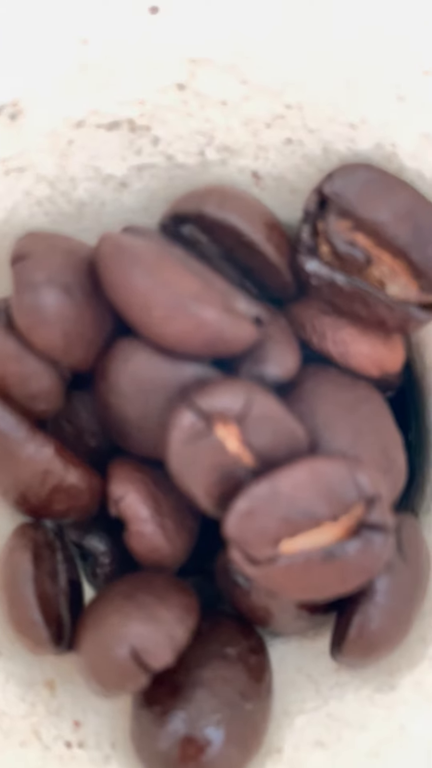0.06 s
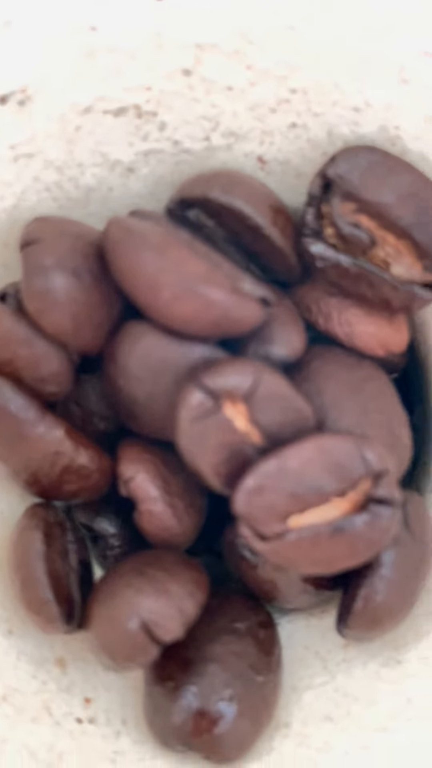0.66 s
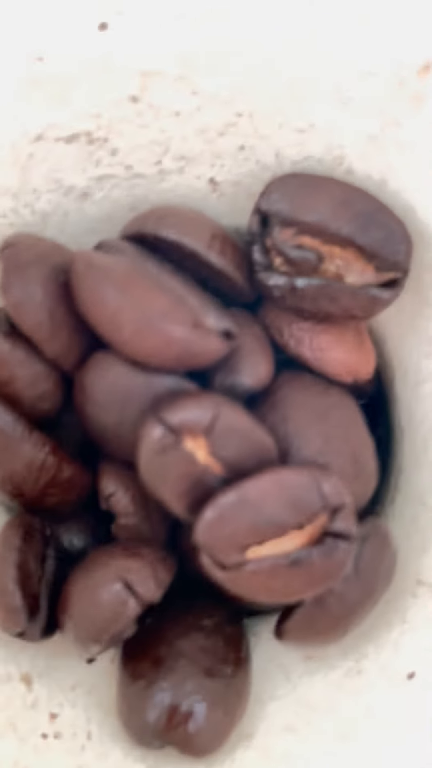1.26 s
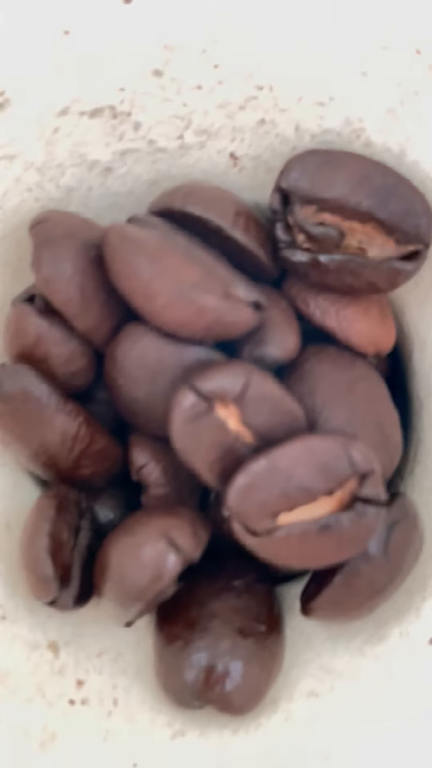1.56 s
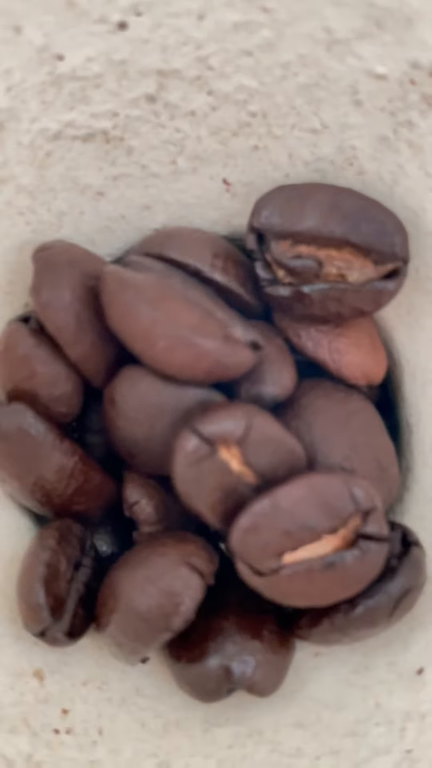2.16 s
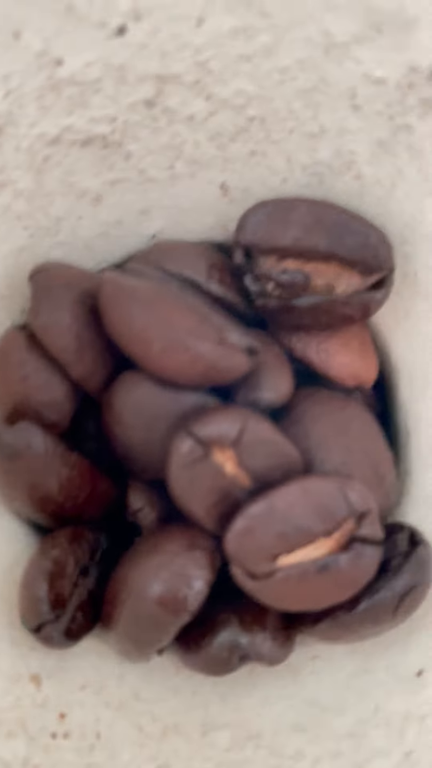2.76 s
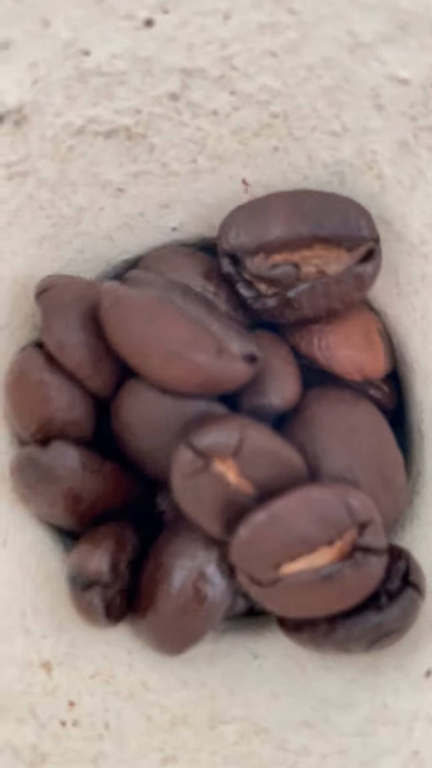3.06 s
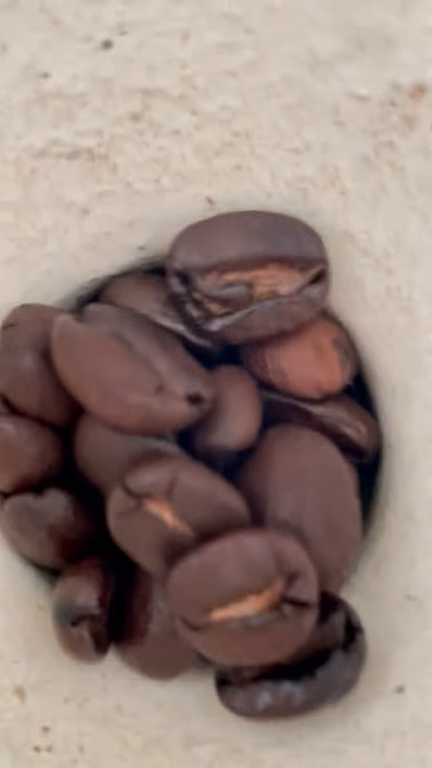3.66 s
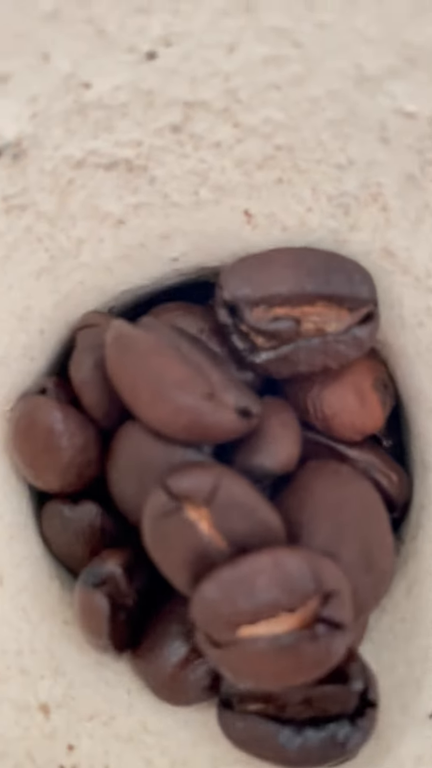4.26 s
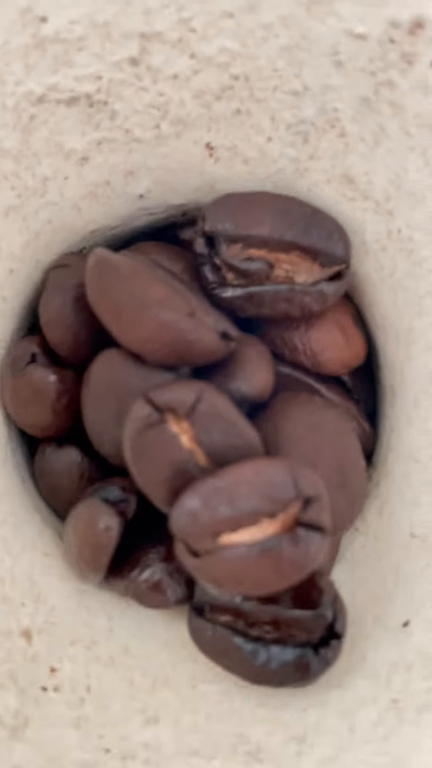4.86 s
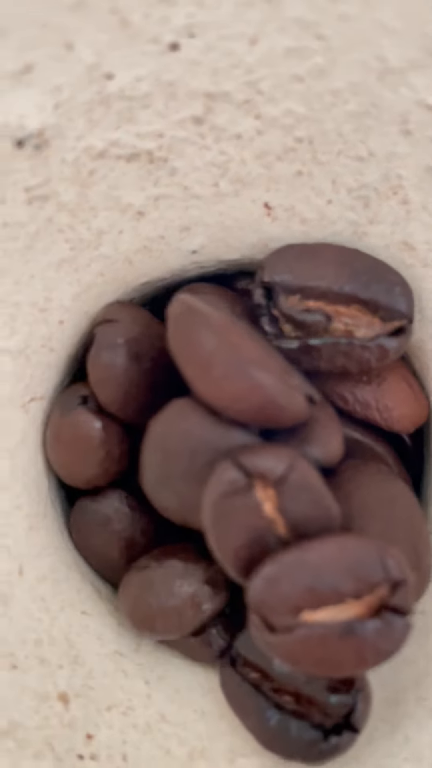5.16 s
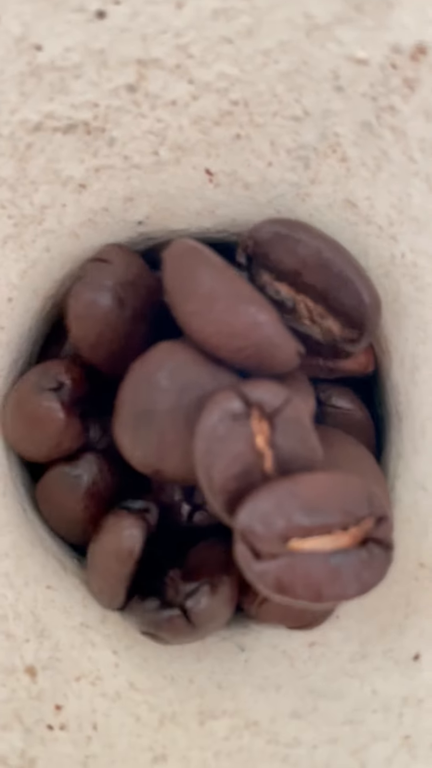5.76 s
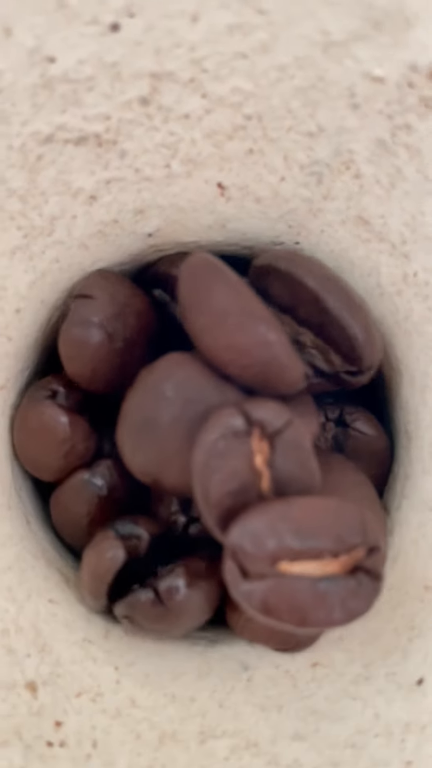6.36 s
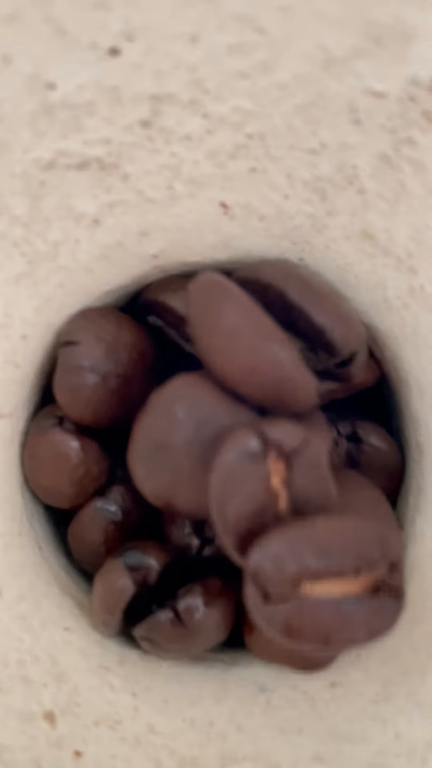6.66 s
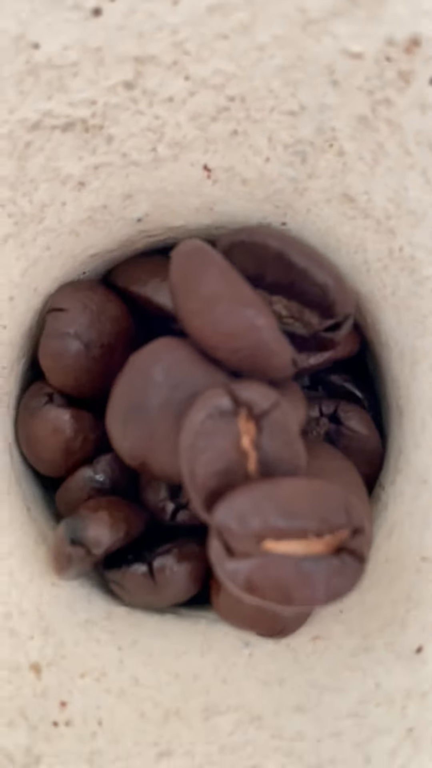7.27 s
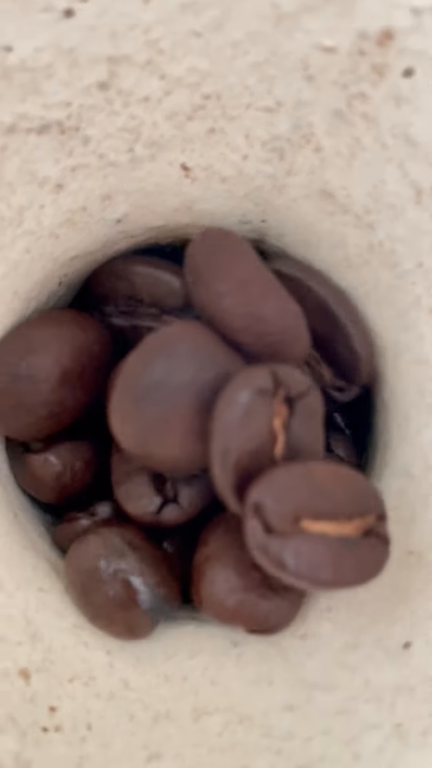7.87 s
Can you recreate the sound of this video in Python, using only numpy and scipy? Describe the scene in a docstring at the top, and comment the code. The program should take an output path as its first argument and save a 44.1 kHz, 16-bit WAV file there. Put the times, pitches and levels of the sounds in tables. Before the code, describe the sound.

Coffee beans crack, crunch and snap very close in a turning hand mill, over a low rumble with soft thuds and brief squeals.

```python
"""First come a few faint taps and a brief low hum in a quiet room: coffee beans shift in a hand mill.
Then, very close by, the burr (the toothed grinding wheel) starts to turn. Whole beans crack, and
their pieces crunch, snap and sizzle, the crunch growing louder the harder the hand pushes.
The mill rumbles, and thuds whenever the burr catches. Now and then the burr rubs and squeals."""
import sys
import numpy as np
from scipy import signal
from scipy.fft import rfft, irfft, next_fast_len
from scipy.io import wavfile

SR = 44100
rng = np.random.default_rng(int(sys.argv[2]) if len(sys.argv) > 2 else 0)


def digitize_waveform(pressure):
    """Quantize a signal to 16-bit integers and store it at the path in sys.argv[1].

    Rows of a 2-D input are taken as channels; values are limited to [-1, 1].
    """
    field = np.atleast_2d(pressure).T
    bounded = np.clip(field, -1, 1)
    quanta = np.round(bounded * 32767).astype(np.int16)
    wavfile.write(sys.argv[1], SR, quanta)


N = 358091
TIME = np.arange(N) / SR

# Tone colours: how much bass and treble a sound has. Each row: frequency in Hz, strength in dB.
ROOM_COLOUR = [(22, -40), (52, 10), (90, -5), (150, -7), (270, -4.5), (500, -22.5), (800, -22.5),
               (1500, -30), (4000, -35), (9000, -40), (16000, -50)]
RUMBLE_COLOUR = [(28, -34), (52, -6), (90, -6), (125, 0), (160, 0), (215, -2), (265, 1.5), (305, -2.5),
                 (375, -1), (480, -13), (700, -32), (2000, -70)]
SIZZLE_COLOUR = [(9000, -55), (13200, -18), (13900, 6), (14500, -13), (16000, -22)]
SNAP_COLOUR = [(600, -14), (1500, 0), (3000, -5), (6000, 8), (8500, 0), (10000, -13.5), (14000, 13),
               (16000, -3.5)]
CRUNCH_COLOUR = [(30, -24), (100, -8), (380, -5.5), (600, -12.5), (800, -8), (1300, 2.5), (1750, 1),
                 (2400, -5), (3000, -2), (4500, -8), (6400, -5.5), (7400, -10.5), (8600, -13), (12600, -17),
                 (15500, -16)]
CRACK_COLOUR = [(60, -17), (230, 1), (550, -16), (800, -11), (1150, 1.5), (1700, 2), (2400, -5), (3000, -6),
                (4400, -7), (5800, -14), (7400, -16), (8600, -13), (10500, -15), (15500, -25)]

# Notes the mill rings with. Each row: pitch in Hz, level in dB, seconds to fade by 60 dB.
IDLE_NOTES = [(860, -45, 0.45), (1430, -45, 0.21), (3180, -50, .12), (4330, -53, 0.4), (4500, -51, 0.2),
              (6440, -56, .3), (8580, -57, .15)]  # the resting burr
MILL_NOTES = [(1530, -44.5, 0.01), (1838, -49.5, 0.091), (2383, -30.5, 0.016), (3680, -76, 0.009),
              (4325, -44.5, 0.038), (4620, -30, 0.011), (6440, -47, 0.081), (7700, -66, 0.025),
              (8660, -18.5, 0.005), (9130, -31, 0.027), (13300, -60, 0.017)]  # the whole mill with its burr
OUTER_BURR_NOTES = [(1800, -52, 0.023), (3670, -29, 0.015)]  # the part a breaking bean is wedged against

# The room's echo. Each row: frequency in Hz, seconds to fade by 60 dB.
ECHO_FADE = [(200, 0.6), (1400, 0.071), (4000, 0.15), (12000, 0.04)]
# The microphone's two openings. Each row: frequency in Hz, how far the left one leads in radians.
LEFT_LEAD = [(0, 0), (860, -0.2), (2410, 0.4), (3960, 0.5), (4570, 0.9), (4820, 1.8), (5080, -0.3),
             (6370, 0.9), (9130, 2.9), (11500, 3.4), (11800, 4.0), (14000, 5.5), (14600, 6.2), (16500, 6.3)]
# How hard the hand turns the burr. Each row: time in seconds, effort in dB.
HAND_EFFORT = [(0.66, -94), (0.74, -40.5), (0.81, -34), (0.85, -26), (1.0, -32), (1.13, -31), (1.2, -26.5),
               (1.4, -30), (1.54, -23.5), (1.88, -26), (2.05, -23.5), (2.52, -27), (3.0, -21.5),
               (3.32, -28), (3.38, -31.5), (3.47, -27.5), (3.6, -29.5), (3.98, -26.5), (6.2, -26.5),
               (6.55, -29.5), (7.1, -26), (7.6, -28), (8.1, -27.5)]
# How much the fine grounds sizzle. Each row: time in seconds, level change in dB.
SIZZLE_AMOUNT = [(.8, -23), (3.5, -21), (5.8, -16.5), (7.1, -14), (8.1, -21)]
# A stronger crack runs longer through the bean. Each row: crack level in dB, length in seconds.
CRACK_LENGTHS = [(-20, .002), (-9, .0065)]

# Beans shift before the turning starts. Each row: start in seconds, relative level in dB.
TOUCHES = [(.14, -59), (.158, -48), (.182, -52), (.235, -49), (.246, -40), (.354, -57), (.387, -58),
           (.492, -70), (.657, -59), (.663, -50.5), (.694, -47.5), (.727, -47)]
# The burr catches. Each row: loudest moment in seconds, relative level in dB, pitch then in Hz.
THUDS = [(0.864, -34, 182), (1.321, -29.5, 230), (1.565, -29.5, 250), (1.76, -29.5, 228), (2.008, -28, 192),
         (2.052, -26.5, 225), (2.376, -24.5, 215), (2.44, -26.5, 235.6), (2.568, -29.5, 244),
         (2.626, -29.5, 178), (2.852, -29.5, 188), (3.011, -28.5, 215), (3.052, -25, 189),
         (3.325, -35, 251), (3.734, -30, 209), (3.898, -25, 251), (3.953, -24.5, 221), (4.36, -27.5, 244),
         (4.538, -27.5, 185), (4.6, -31, 366), (4.731, -23.5, 199), (4.983, -22.5, 193), (5.03, -32, 345),
         (5.138, -30.5, 257), (5.357, -26, 234), (5.5, -31.5, 195), (5.708, -28.5, 207), (5.8, -29, 201),
         (5.916, -30.5, 190), (6.164, -26.5, 142), (6.233, -27, 247), (6.333, -32, 159), (6.41, -29, 191),
         (6.775, -29.5, 214), (7.039, -29, 241), (7.168, -26.5, 167.5), (7.401, -31.5, 144),
         (7.437, -30, 250), (7.476, -29.5, 262), (7.93, -33, 273), (8.1, -28, 200)]
# The burr sings. Each row: start in seconds, length in seconds, pitch in Hz, relative level in dB.
SQUEALS = [(1.483, 0.045, 7000, -33.5), (1.583, 0.033, 6440, -13), (1.607, 0.048, 6440, -22),
           (1.651, 0.036, 6430, -21), (1.662, .013, 6220, -21), (1.69, 0.033, 6440, -33),
           (3.29, 0.018, 6640, -24), (3.308, 0.02, 6400, -26), (4.604, 0.0076, 6440, -18.5),
           (6.62, 0.03, 6300, -31), (6.65, 0.027, 6440, -25.5), (6.668, 0.047, 6440, -34),
           (7.413, 0.021, 6400, -30.5), (7.43, 0.027, 6440, -32), (0.365, 0.078, 6440, -70)]
# Thin splinters of shell snap. Each row: start in seconds, relative level in dB.
SNAPS = [(0.9342, -10.5), (1.21, -9.5), (2.0707, -8), (2.7968, -13), (2.9464, -14), (3.1038, -17),
         (3.437, -19), (3.4553, -13), (3.466, -9), (3.9644, -8), (3.9823, -11), (3.9866, -11.5),
         (4.429, -17), (4.605, -16), (4.786, -17), (5.4659, -9), (5.7729, -13), (5.8361, -8), (5.8514, -13),
         (5.908, -14.5), (6.537, -10.5), (7.0818, -10), (7.0882, -15), (7.1071, -18), (7.4674, -15)]
# Pieces get squashed. Each row: time in seconds, relative level in dB, brightness in dB.
CRUMBLES = [(1.226, -22.5, -1), (1.537, -26.5, -6), (1.561, -25, 0.0), (2.032, -22.5, 6), (2.153, -25, -8),
            (2.254, -25, -16), (2.553, -25, 5), (2.666, -28, 3), (2.634, -27, 4), (2.893, -25, 8),
            (2.913, -28, -8), (2.975, -21, -13), (3.03, -23.5, -13), (3.05, -25, -7), (3.156, -25, -12),
            (3.189, -19.5, -5), (3.273, -20.5, 2), (3.495, -25, -6), (3.575, -26, 2), (3.608, -25.5, -8),
            (3.648, -22, -10), (3.691, -26, 0), (3.892, -25.5, -2), (4.003, -25, 3), (4.187, -26.5, 4),
            (4.258, -24, -2.0), (4.366, -24.5, -2), (4.545, -25, -9), (4.692, -24.5, 0), (4.711, -21.5, 12),
            (4.974, -24.5, -4), (5.059, -22.5, -6), (5.118, -24.5, -5), (5.136, -25.5, -3),
            (5.226, -30, 6.0), (5.275, -24, -3), (5.378, -26, -4), (5.394, -25, 1), (5.493, -26, -22),
            (5.574, -26.5, 8.5), (5.628, -26, 2), (5.772, -26, -4), (5.872, -26.5, 4.5), (5.886, -25, -10),
            (5.974, -26, -11), (6.084, -24, -2), (6.179, -22.5, 1), (6.241, -24, -3), (6.417, -20.5, -3),
            (6.483, -26, 4), (6.614, -24, -2), (6.74, -25.5, -7), (6.758, -23.5, -5), (6.882, -25, 5),
            (6.915, -19.5, -11), (6.967, -25.5, 3), (7.038, -26.5, 6), (7.081, -22.5, -11), (7.192, -26, 0),
            (7.557, -21, 2), (7.805, -28.5, -4), (7.87, -22.5, 0), (8.072, -23, -1), (8.105, -21.5, 0)]
# Whole beans break. Each row: time in seconds, relative level in dB, brightness in dB,
# crumbling before the break in dB compared with the crack, the bean's pitch in Hz.
CRACKS = [(0.762, -31.5, 20, -17, 2500), (0.827, -11, -6.5, -10, 2400), (1.0168, -16.5, -10, -36, 1900),
          (1.03, -18.5, -3, -27, 1570), (1.175, -12, 4.5, -32, 1570), (1.33, -9.5, 5.5, -4.5, 2310),
          (1.615, -10.5, -1, -23, 1110), (1.644, -16, 9, -27, 2580), (1.9516, -11.5, 3, -29, 2240),
          (1.9903, -16.5, 3, -27.5, 1030), (2.101, -17, -1, -21, 1240), (2.334, -13, 10.5, -28, 1560),
          (2.385, -16, -1, 0, 1200), (2.4395, -11, 1.5, -4.5, 2600), (2.688, -18.5, 13, -18, 2250),
          (2.797, -11, 5, -15, 2360), (2.93, -16, 1, -27, 1090), (3.005, -13.5, -10, -7, 1420),
          (3.2528, -17, 7, -25, 1250), (3.2873, -13.5, 0, -12, 1090), (3.3187, -10, 0.5, -2, 2450),
          (3.551, -12.5, 2.5, -17, 1460), (3.6689, -13, 7, -10, 2560), (3.7683, -13.5, 1, -1.5, 1370),
          (3.816, -17, -10, -0.5, 2300), (3.9681, -18.5, 9, 1, 1800), (3.977, -14, -3, -7, 1330),
          (4.1092, -16.5, -2, -25, 1800), (4.1153, -16.5, 3, -3, 2350), (4.2023, -19, 7, -28.5, 2410),
          (4.3297, -15, -6, -20, 1800), (4.485, -18, -5, -6, 2180), (4.6044, -17, 10, -25, 2550),
          (5.152, -18.5, -8, 1, 1800), (5.188, -20.5, 15, -23, 1890), (5.245, -19.5, 13, 1.5, 2280),
          (5.4634, -11, 7, -25, 3650), (5.521, -17, -5, -27, 1750), (5.5443, -20.5, 12, -26, 2240),
          (5.835, -12, 10, -21, 1460), (5.991, -12, -3.5, -12, 1700), (6.1355, -10.5, 3, -26, 1650),
          (6.2263, -9, 6.5, -16.5, 1490), (6.2935, -12.5, -3, -25, 1260), (6.3433, -16, 2, -1, 1620),
          (6.44, -8.5, 1, -12, 1870), (6.5371, -15, 11, -12, 1830), (6.652, -14.5, 8, -33, 1500),
          (6.7089, -17, 0, -31.5, 1100), (6.7639, -19, 6, 5, 1460), (6.8903, -10, 6.5, -16.5, 1620),
          (7.059, -18, 5, 1, 1260), (7.2448, -13, 0.5, -25, 1290), (7.315, -16, 3, -8, 1390),
          (7.346, -10, 7.5, -10, 1830), (7.399, -17.5, 3, -24, 1850), (7.491, -17.5, 0, -32, 2000),
          (7.5865, -14, -1, -11.5, 1420), (7.691, -11, 0.5, -10, 1800), (7.9214, -8, 10, -10, 1760),
          (8.025, -20, -6, -21, 1630)]

BIG_CRACK_DB = -17.5  # a crack above this level eases the load and jolts the mill


def from_db(db):
    """Turns decibels into a number to multiply by."""
    return 10 ** (np.asarray(db) / 20)


def unit(x):
    """Scales a signal to an average (rms) size of 1."""
    return x / np.sqrt(np.mean(x ** 2) + 1e-20)


def unit_energy(x):
    """Scales a short sound to a total energy of 1."""
    return x / np.linalg.norm(x)


def look_up(table, hz):
    """Reads between a table's rows, on a scale of octaves."""
    row_hz, value = np.transpose(table)
    return np.interp(np.log(hz + 1), np.log(row_hz + 1), value)


def add(mix, start_s, sound):
    """Lays a sound into the mix."""
    part = mix[max(round(start_s * SR), 0):][:len(sound)]
    part += sound[:len(part)]


def wander(per_s, points):
    """A random curve that takes a new direction per_s times a second."""
    return unit(np.interp(TIME * per_s, np.arange(points), rng.standard_normal(points)))


def noise(colour):
    """Steady noise with the given tone colour."""
    shape = from_db(look_up(colour, np.fft.rfftfreq(N, 1 / SR)))
    return unit(irfft(rfft(rng.standard_normal(N)) * shape, N))


def click(colour, bright_db, patchy_db, smear_s, peak_hz=1500, peak_db=0, size=2048):
    """One tiny break. Each piece rings its own way, and paths through the mill smear the click."""
    hz = np.fft.rfftfreq(size, 1 / SR)
    grid = np.linspace(np.log(500), np.log(SR / 2), 48)
    patches, paths = (np.interp(np.log(hz + 500), grid, row) for row in rng.standard_normal((2, 48)))
    treble = hz ** 4 / (hz ** 4 + 2800. ** 4)
    db = look_up(colour, hz) + bright_db * treble + patchy_db * patches
    db += peak_db / (1 + (np.log2((hz + 1) / peak_hz) / 0.11) ** 2)  # a narrow peak gives a pitch
    log_gain = np.log(from_db(np.r_[db, db[-2:0:-1]]))
    spectrum = np.exp(np.conj(signal.hilbert(log_gain)))[:len(hz)]  # makes the click start sharply
    delay = np.exp(-2j * np.pi * np.cumsum(smear_s * abs(paths)) * hz[1])
    return unit_energy(irfft(spectrum * delay) * np.hanning(2 * size)[size:])


def ticks(rows, colour, gain_db, patchy_db, scatter_s):
    """Single small clicks, each with a little scatter after it."""
    out, t = np.zeros(N), TIME[:SR // 40]
    for start, db in rows:
        push = 0.65 * rng.standard_normal(len(t)) * np.exp(-t / scatter_s)
        push[0] = 1
        sound = signal.fftconvolve(push, click(colour, 0, patchy_db, smear_s=0.00027))
        add(out, start, from_db(db + gain_db) * unit_energy(sound))
    return out


def ringing(x, notes):
    """Every blow also sets the given notes ringing."""
    t = TIME[:SR // 4]
    ring = sum(from_db(db - 60 * t / fade_s) * np.cos(2 * np.pi * hz * t) for hz, db, fade_s in notes)
    return x + signal.oaconvolve(x, ring)[:N]


def stereo(x, delay_s=0):
    """Sound reaches the microphone's two openings out of step; an off-centre source adds a delay."""
    size = next_fast_len(N + SR // 10)
    hz = np.fft.rfftfreq(size, 1 / SR)
    lead = np.interp(hz, *np.transpose(LEFT_LEAD)) + 2 * np.pi * hz * delay_s
    sides = np.array([np.ones(len(hz)), np.exp(-1j * lead)])
    return irfft(rfft(x, size) * sides, size)[:, :N]


def room_echo(x):
    """The room gives a short echo whose bass lasts longest and is alike on both sides."""
    hz, t, bands = signal.stft(rng.standard_normal((2, SR // 2)), SR, nperseg=256)
    shared = 1 / (1 + (hz[:, None] / 700) ** 4)
    bands[1] = shared * bands[0] + np.sqrt(1 - shared ** 2) * bands[1]
    fade = from_db(-60 * t / look_up(ECHO_FADE, hz)[:, None]) * (t > .004)
    tail = signal.istft(bands * fade, SR, nperseg=256)[1]
    return signal.oaconvolve(x[None], tail / np.linalg.norm(tail[0]), axes=1)[:, :N]


def idle_rub(db=-68):
    """A hand rests on the crank, and the burr rubs just enough to ring faintly."""
    rub = from_db(db) * rng.standard_normal(N)
    return ringing(rub, IDLE_NOTES) - rub


def hum(start=.385, end=0.72, hz=108, db=-48):
    """A faint low hum swells briefly before the grinding."""
    swell = np.interp(TIME, [start, start + .03, end - .04, end], [0.15, 1.0, 0.65, 0.09])
    return from_db(db) * swell * np.sin(2 * np.pi * hz * TIME)


def touches():
    """Shifting beans tap the burr, waking only its high notes, and nudge the mill's body."""
    taps = ticks(TOUCHES, CRUNCH_COLOUR, gain_db=19.5, patchy_db=4, scatter_s=0.004)
    bumps = ticks(TOUCHES, RUMBLE_COLOUR, gain_db=18, patchy_db=4.5, scatter_s=0.0038)
    return ringing(taps, IDLE_NOTES[3:]) + bumps


def burr_load(dip_per_db=0.11, deepest_s=0.051):
    """The load on the burr in dB: the hand's effort, with a dip as each big crack frees the burr."""
    load = np.interp(TIME, *np.transpose(HAND_EFFORT), left=-100)
    age = TIME[:SR // 3] / deepest_s
    dip = (age * np.exp(1 - age)) ** 2
    for start, db, *_ in CRACKS:
        add(load, start, -dip_per_db * max(db - BIG_CRACK_DB, 0) * dip)
    return load


def rumble(load_db):
    """The heavy body rumbles under the crank, following a load that comes in lumps."""
    steady = noise(RUMBLE_COLOUR) * from_db(-22 + 0.7 * load_db)
    return steady * from_db(4.5 * np.tanh(wander(per_s=35, points=600)))


def thuds(gain_db=2, rise_s=.016, pitch_fall=.85):
    """When the burr catches or a big crack jolts it, the body gives a soft knock of falling pitch."""
    out, t = np.zeros(N), TIME[:SR // 10]
    age = t / rise_s
    swell = (age * np.exp(1 - age)) ** 3
    rattle = noise(RUMBLE_COLOUR)
    jolt_hz = 255 * np.exp(0.129 * rng.standard_normal(len(CRACKS)))
    jolts = [(when, db - 29, hz) for (when, db, *_), hz in zip(CRACKS, jolt_hz) if db > BIG_CRACK_DB]
    for when, db, hz in THUDS + jolts:
        cycles = np.cumsum(hz * pitch_fall ** (age - 1)) / SR + rng.random()
        swing = np.sin(2 * np.pi * cycles) + 0.39 * np.roll(rattle, -round(when * SR))[:len(t)]
        add(out, when - rise_s, from_db(db + gain_db) * swell * swing)
    return out


def squeals(gain_db=3, waver=0.0017):
    """The burr sticks and slips, singing one high, wavering note in short bursts."""
    out = np.zeros(N)
    drift, flutter_db = wander(per_s=73, points=2000), wander(per_s=320, points=4000)
    for start, length, hz, db in SQUEALS:
        span = np.arange(round(start * SR), round((start + length) * SR))
        tone = np.sin(2 * np.pi * np.cumsum(hz * (1 + waver * drift[span])) / SR)
        fade = signal.windows.tukey(len(span), .7)
        add(out, start, from_db(db + gain_db - flutter_db[span]) * fade * tone)
    return out


def fragment(colour, patchy_db, smear_s, burst_s):
    """One small piece gives way: a first break, then a quick flurry of smaller ones."""
    t = TIME[:SR // 70]
    spikes = rng.standard_normal(len(t)) ** 3
    flurry = unit_energy(spikes * np.exp(-t / (burst_s * rng.uniform(0.39, 2.96))))
    flurry[0] += 1
    body = click(colour, rng.normal(0, 3.2), patchy_db, smear_s)
    return unit_energy(signal.fftconvolve(flurry, body))


def crunch(load_db, colour, gain_db, per_s, spread_db, clump_db, patchy_db, smear_s, burst_s, kinds=24):
    """Pieces of many sizes are crushed in clumps, about per_s of them a second."""
    sizes = from_db(spread_db * np.minimum(rng.exponential(1, N), 3)) * rng.choice([-1, 1], N)
    hits = sizes * (rng.random(N) < per_s / SR)
    hits *= from_db(clump_db * np.tanh(wander(per_s=97, points=2000)))
    hits = unit(hits) * from_db(load_db + gain_db)
    kind = rng.integers(0, kinds, N)
    return sum(signal.oaconvolve(hits * (kind == k), fragment(colour, patchy_db, smear_s, burst_s))[:N]
               for k in range(kinds))


def crumbles(gain_db=-2, rise_s=.003):
    """A broken piece is squashed: a tight cluster of tiny breaks swells and dies away."""
    out, t = np.zeros(N), TIME[:SR // 25]
    scale = np.sqrt(.012 * SR)  # the energy of 12 ms of sound at size 1
    for when, db, bright_db in CRUMBLES:
        breaks = np.tanh(rng.standard_normal(len(t)) ** 3 / 5) * t * np.exp(-t / rise_s)
        body = click(CRACK_COLOUR, bright_db + 1, patchy_db=3.2, smear_s=0.000752)
        sound = unit_energy(signal.fftconvolve(breaks, body))
        add(out, when - 2 * rise_s, from_db(db + gain_db) * scale * sound)
    return out


def splitting(length_s, gap_s=.0005, uneven_db=3, fade_db=7, first_db=4):
    """A crack runs through a bean in quick, uneven steps, the first the largest, then stops short."""
    gaps, chance = rng.uniform(-1, 1, (2, 24))
    times = np.r_[0, np.cumsum(gap_s * (1 + .8 * gaps))[:-1]]
    sizes = from_db(uneven_db * chance - fade_db * times / length_s) * (times < length_s)
    sizes *= rng.choice([-1, 1], len(times))
    sizes[0] = from_db(first_db)
    return np.bincount((times * SR).astype(int), sizes)


def cracks(gain_db=-3.5, build_s=0.0073, settle_s=0.0022, settle_db=-13):
    """A bean crumbles under growing load, splits, and its pieces settle."""
    out, t = np.zeros(N), TIME[:SR // 16]
    scale = np.sqrt(.006 * SR)  # the energy of 6 ms of sound at size 1
    for when, db, bright_db, before_db, hz in CRACKS:
        body = click(CRACK_COLOUR, bright_db - 1, patchy_db=2, smear_s=0.000833, peak_hz=hz, peak_db=6)
        spikes = rng.standard_normal((2, len(t))) ** 3
        build_up = (spikes[0] * np.exp(-t / build_s))[::-1]
        settling = spikes[1] * np.exp(-t / settle_s)
        length_s = np.interp(db, *np.transpose(CRACK_LENGTHS))
        stages = [(when - t[-1], build_up, before_db - 1),
                  (when, splitting(length_s), 0),
                  (when + length_s, settling, settle_db)]
        for start, stage, stage_db in stages:
            sound = unit_energy(signal.fftconvolve(stage, body))
            add(out, start, from_db(db + stage_db + gain_db) * scale * sound)
    return out


def scene():
    """The mill and its beans close up, over a quiet room."""
    load = burr_load()
    coarse = crunch(load, CRUNCH_COLOUR, gain_db=-5.5, per_s=190, spread_db=3, clump_db=4,
                    patchy_db=3.2, smear_s=0.0007, burst_s=0.0018)
    powder = crunch(load, CRUNCH_COLOUR, gain_db=-8, per_s=2200, spread_db=1.5, clump_db=2.5,
                    patchy_db=1.5, smear_s=0.000529, burst_s=0.00088)
    splinters = crunch(load, SNAP_COLOUR, gain_db=-19.5, per_s=98, spread_db=7, clump_db=4,
                       patchy_db=1.5, smear_s=0.00045, burst_s=0.00078)
    sizzle = crunch(load, SIZZLE_COLOUR, gain_db=0.5, per_s=590, spread_db=4, clump_db=11,
                    patchy_db=3, smear_s=0.000347, burst_s=0.0013)
    sizzle *= from_db(np.interp(TIME, *np.transpose(SIZZLE_AMOUNT)))
    snaps = ticks(SNAPS, SNAP_COLOUR, gain_db=11.5, patchy_db=2, scatter_s=0.0004)
    shifting = touches()
    breaking = ringing(cracks() + crumbles(), OUTER_BURR_NOTES)
    centre = ringing(breaking + coarse, MILL_NOTES) + shifting + sizzle
    centre += idle_rub() + rumble(load) + thuds() + squeals() + hum()
    rim = ringing(powder + splinters, MILL_NOTES)  # fine bits are crushed at the burr's edge
    air = from_db(-57) * noise(ROOM_COLOUR)
    direct = stereo(centre + air) + stereo(rim, delay_s=5e-6) + snaps  # snaps reach both sides alike
    return direct + from_db(-17) * room_echo(centre + rim + snaps)


def record(dry):
    """The microphone drops the deepest bass, rounds off the loudest cracks and cuts the top treble."""
    no_deep_bass = signal.sosfilt(signal.butter(3, 40, "high", fs=SR, output="sos"), dry)
    rounded = no_deep_bass / (1 + (no_deep_bass / .93) ** 6) ** (1 / 6)
    treble_cut = signal.firwin(401, 15850, window=("kaiser", 9), fs=SR)
    return signal.oaconvolve(rounded, treble_cut[None], "same")


dry = scene()
out = record(dry)
digitize_waveform(out)
```